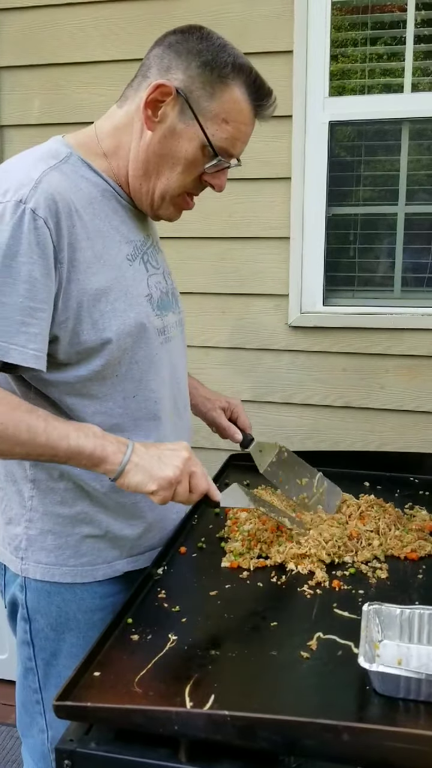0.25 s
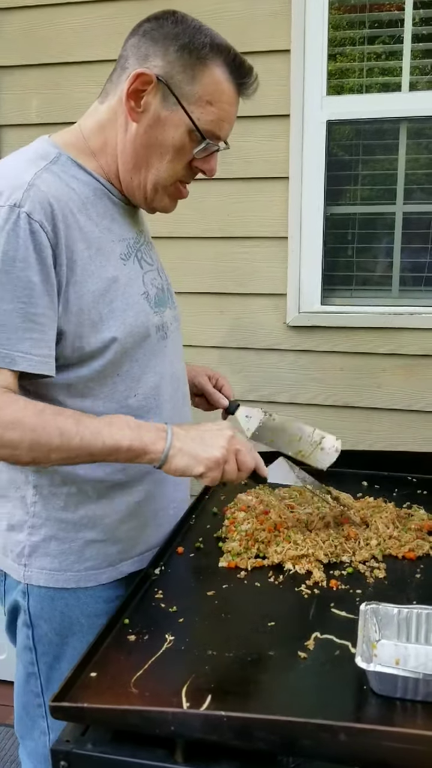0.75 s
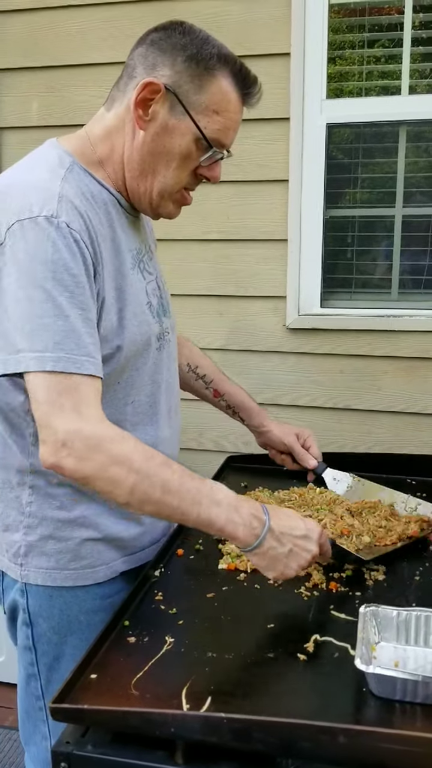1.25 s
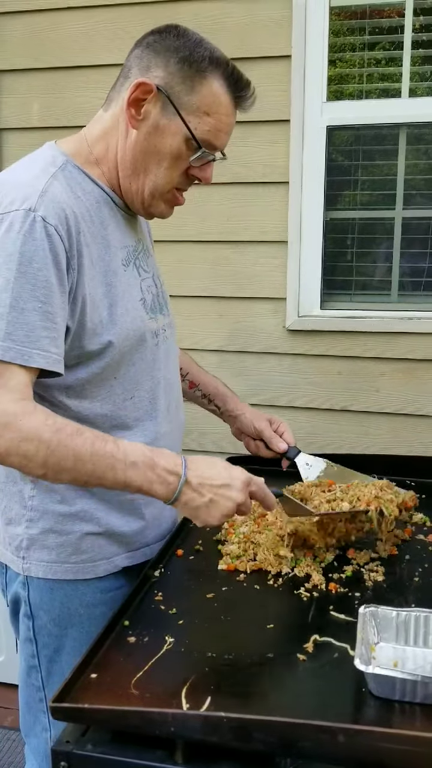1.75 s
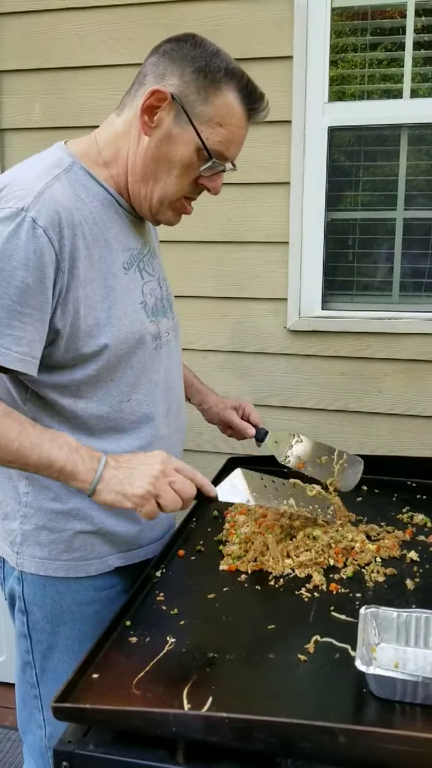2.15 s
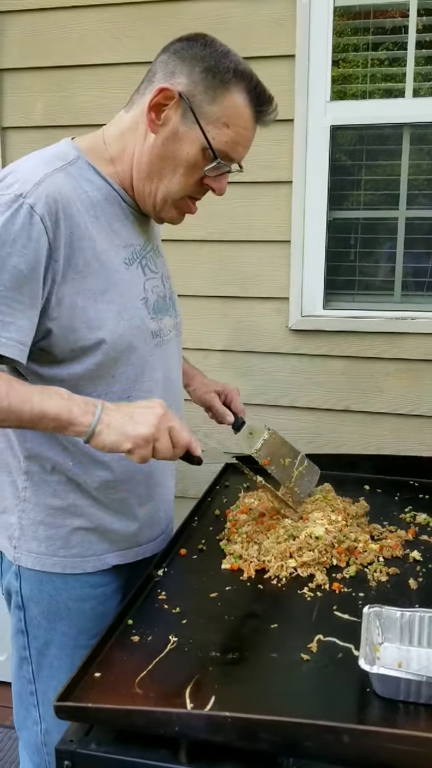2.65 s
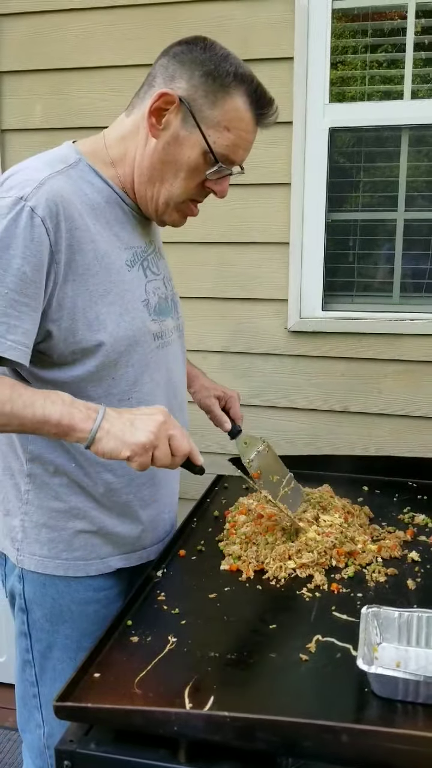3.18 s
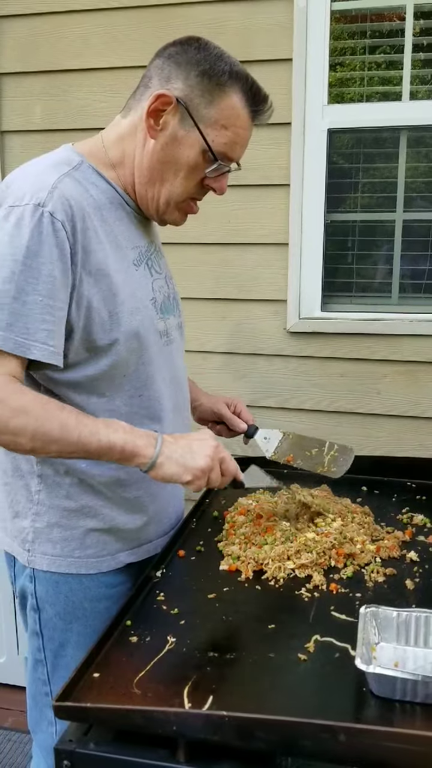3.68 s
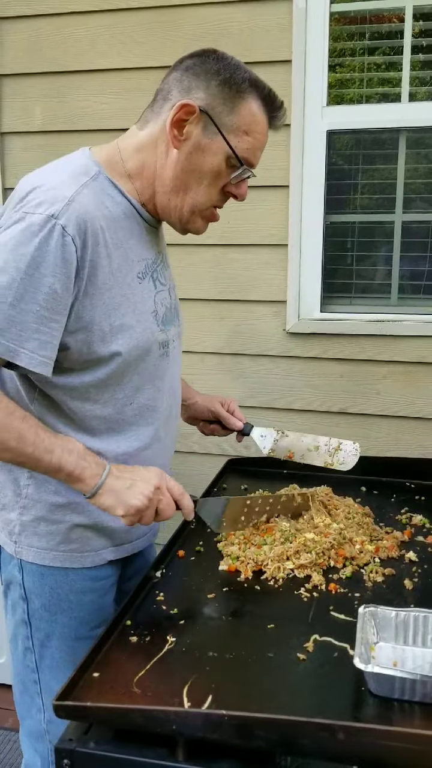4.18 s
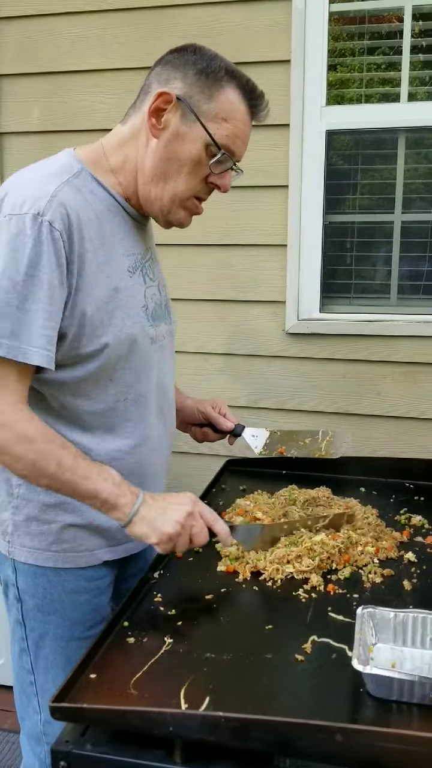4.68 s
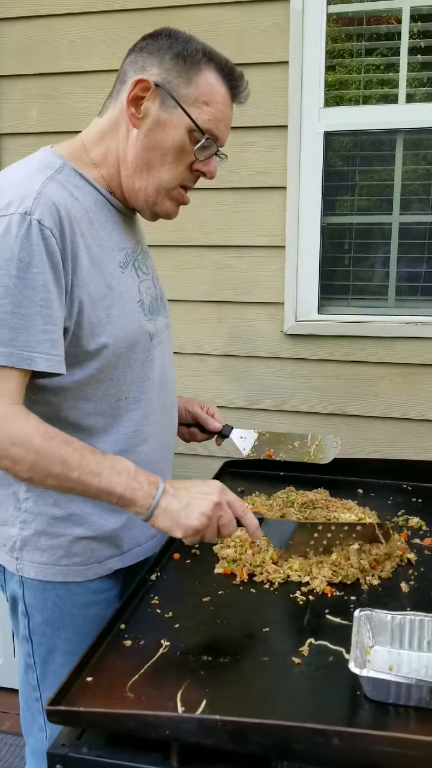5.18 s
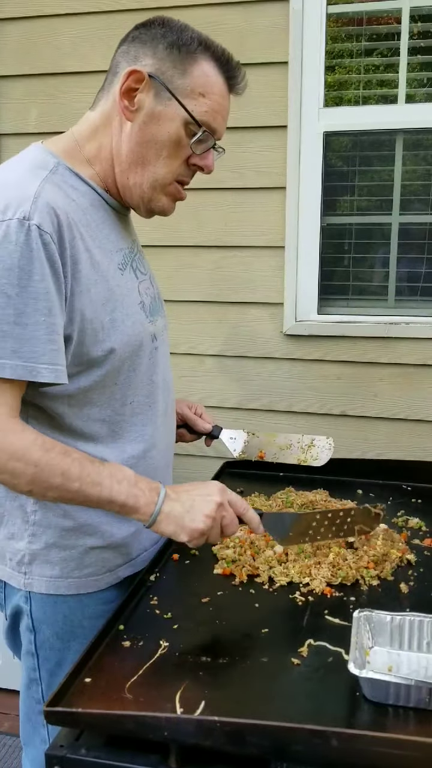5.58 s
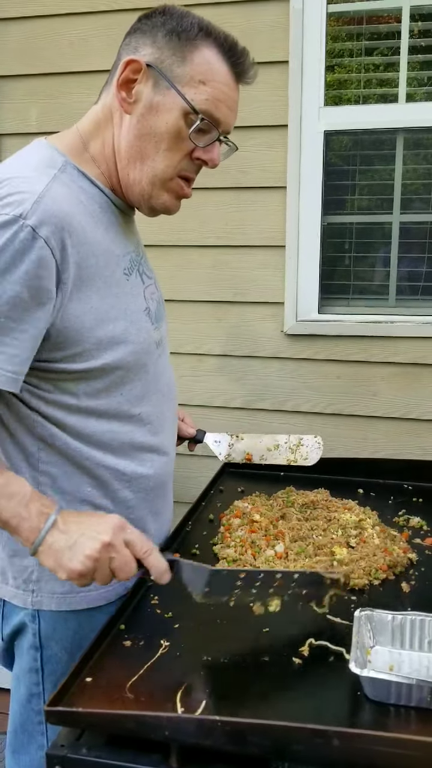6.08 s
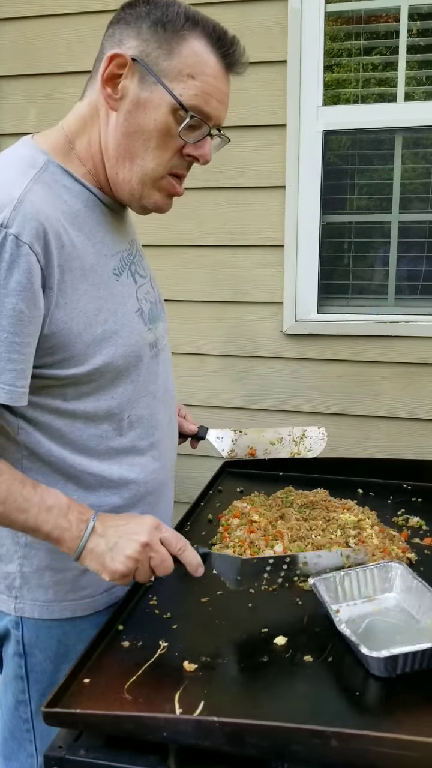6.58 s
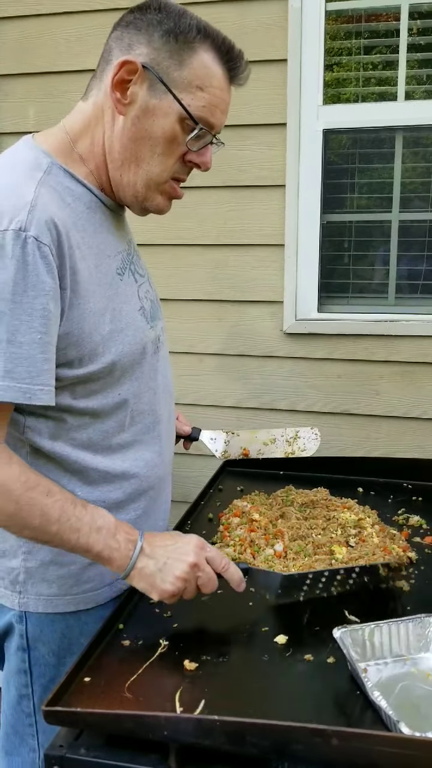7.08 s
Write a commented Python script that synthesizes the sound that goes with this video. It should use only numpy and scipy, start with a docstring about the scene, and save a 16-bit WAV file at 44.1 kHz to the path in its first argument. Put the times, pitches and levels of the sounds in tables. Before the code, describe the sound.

Close stereo outdoors by a house wall, with a faint low rumble and hum. A light sizzle crackles throughout, slightly right, flaring gently when food is turned. A barely audible touch at 0 s and a soft knock at 0.25 s precede a thin blade clink at 0.8 s and a strong, bright clank at 1.04 s, running into a ringing scrape. A sharp oil pop snaps at 1.5 s. Blades clink lightly at 2.3 to 2.5 s and more clearly at 3.0 s; then mostly sizzle and small spits. From 4.3 s come dull, food-cushioned knocks and short scrapes, notably around 4.7, 5.1 and 5.7 s. At 6.3 s a strong, broad scrape swells with livelier sizzle, and a hollow foil tray thumps at 6.4 s. Hard clanks follow at 6.6, 6.8 and 6.9 s with another scrape near 7.0 s; a last bright clank rings at 7.3 s. Reflections are short and dull.

```python
"""Two steel spatulas turn fried rice on an outdoor flat-top griddle, close to a house wall; stereo, blades
right of centre. From the start food sizzles and spits over a low outdoor rumble, and the plate already rings
faintly. A strong clank and a scrape come at about 1 s; until 3 s the blades also clink together. From 4.3 s
come thick blows and scrapes, with a hollow foil tray shoved at 6.4 s and the last clank at 7.3 s. Noise shaped
by steel modes makes the clanks, clinks and scrapes, decaying sines the plate's tones, short bursts the spits,
and filtered noise the sizzle, rumble and wall tail."""
import sys
import numpy as np
from scipy import signal
from scipy.fft import rfft, irfft, next_fast_len
from scipy.io import wavfile
from scipy.ndimage import map_coordinates

SR = 44100
rng = np.random.default_rng(int(sys.argv[2]) if len(sys.argv) > 2 else 0)


def to_wav(s):
    """Save 16-bit WAV."""
    ch = np.atleast_2d(s).T  # columns
    pcm = np.round(np.clip(ch, -1, 1) * 32767)  # PCM
    wavfile.write(sys.argv[1], SR, pcm.astype(np.int16))


N = 323240  # samples

# All level_db columns are relative: later gains are added to them.
# Outdoor rumble spectrum: pitch_hz, level_db
RUMBLE_SPECTRUM = [(12, -47.5), (20, -24), (43, -3), (82, -5), (123, -3), (145, -10), (226, -12),
                   (265, -19.5), (300, -16), (382, -23.5), (458, -20.5), (497, -21), (967, -21),
                   (1920, -34.5), (2500, -39), (3250, -54), (5500, -120)]
RUMBLE_DB = -63.5
# Left-right likeness of the rumble and the wall tail: pitch_hz, likeness (-1 to 1)
AMBIENT_LIKENESS = [(60, 0.91), (130, 0.97), (290, 0.81), (640, 0.71), (1410, 0.56), (3100, 0.77),
                    (6820, -0.59), (15000, 0.091)]
# Sizzle spectrum: pitch_hz, level_db
FRYING_SPECTRUM = [(880, -38.5), (1500, -10), (2000, -8.5), (3450, -1), (5400, 2), (9000, -5.5), (12000, 3),
                   (14000, -6), (16000, -1)]
# Food turned onto bare hot steel: start_s, flare_db
FOOD_TURNS = [(0.26, -56), (1.081, -62), (2.4, -61.5), (4.28, -59), (5.35, -60), (6.28, -45)]
SIMMER_DB = -63  # food left alone, before the sizzle's own gains
FLARE_RISE_S, FLARE_DRY_S = 0.07, 0.72  # fresh moisture boils up quickly, then dries off
# Loudest spits of hot oil: start_s, level_db, zing_db, left_minus_right_db
OIL_SPITS = [(0.189, -37, -8, 4.5), (0.8727, -30, 0, 6), (0.9918, -26, -2, -1.5), (1.0136, -36.5, -6, 0),
             (1.5334, -15, -1.5, -1), (1.7659, -36.5, -4.5, 3), (2.4198, -29.5, -4, 6.5),
             (2.587, -30, 3, -1.5), (3.265, -19.5, 2.5, -1), (3.713, -23, 8.5, 4.5),
             (3.8557, -32.5, 4.5, -4.5), (4.2183, -32, 7.5, 7.5), (4.4615, -27, 1.5, -2.5),
             (4.49, -32.5, 0, 0.5), (4.8454, -21, 3.5, -5)]
# Blade against blade: start_s, level_db, body_db, zing_db, note_hz, left_minus_right_db, rise_s
BLADE_CLINKS = [(0.7871, -31.5, -11.5, -6.5, 2210, 0.5, 0.001), (2.3364, -27, -3, 1.5, 2230, 1, 0.003),
                (2.472, -32.5, 1.5, 1, 1680, 2, 0.017), (2.9942, -20, -7, 3.5, 1445, 2.5, 0.0013)]
# Strokes along the plate: start_s, push_s, hold_s, release_t60_s, pressure_db, brightness_db,
# tilt_db (brightening as the blade tilts)
BLADE_STROKES = [(1.11, 0.063, 0.036, 0.44, -32, 3.5, 4), (4.295, 0.019, 0.058, 0.095, -46.5, -15.5, -5),
                 (4.712, 0.027, .005, 0.25, -46.5, -2.5, 3), (5.036, 0.066, 0.014, 0.3, -37.5, -4.5, -10.5),
                 (5.771, 0.035, .005, 0.145, -47.5, -3, -2), (6.289, .055, 0.084, 0.27, -25, -2, -7),
                 (6.712, .025, .01, 0.28, -41, -10, -1), (6.974, 0.084, 0.037, 0.26, -32.5, -4, 2)]
# Blows on the plate: start_s, level_db, thud_db, edge_db, zing_db, ring_factor (scales decay time),
# low_hz, high_hz (resonances of the contact point)
PLATE_BLOWS = [(0.002, -44, -10.5, -6, -13.5, 1.02, 1070, 1480),
               (0.254, -31.5, -7, 1, -3.5, 1.08, 1084, 1440),
               (1.036, -11, -24.5, -1.5, -2, 1.04, 741, 2770), (3.083, -39, -13, 3, -0.5, 0.9, 1060, 2100),
               (4.283, -30.5, -11.5, -34, -19.5, 0.79, 1070, 1256),
               (4.643, -29, -15, 1, -3, 1.01, 1090, 1810), (4.679, -23, -14, -5.5, -8.5, 0.75, 965, 3290),
               (5.0895, -33, -35, -0.5, -5, 0.412, 1320, 5120),
               (5.103, -25.5, -35, -5, -18.5, 0.78, 1320, 2900),
               (5.42, -40.5, -7, -8.5, -4, 1.24, 727, 1320), (5.488, -37, -19, -6, -6.5, 0.65, 947, 1470),
               (5.718, -22, -16.5, -14.5, -26.5, 0.81, 1210, 1430),
               (6.226, -23, -20, -4, -11, 1.5, 1050, 2180),
               (6.569, -19, -13.5, -7.5, -2.5, 0.64, 810, 1250),
               (6.589, -16.5, -35, -5, -11, 0.18, 1260, 1380),
               (6.808, -13.5, -16.5, -6, -12.5, 0.98, 1030, 1384),
               (6.9248, -12.5, -20.5, -5.5, 3.5, 0.39, 917, 3270),
               (7.2933, -12, -26, 0, -6.5, 1, 966, 2770)]
# Long tones of the plate: pitch_hz, level_db, t60_s
PLATE_TONES = [(275, -12, .8), (360, -7, 1.0), (405, -5, .65), (706, -18, .85), (925, -14, .4),
               (945, -13, .5), (1092, -18, .3), (1339, -9, .22), (1441, -15, .3), (1625, -9, .2),
               (2078, -8, .18), (2177, -9, .2), (2264, -9, .18), (2527, -12, .2), (7533, -4, .14),
               (7812, -9, .12), (9226, -8, .14), (11551, -6, .13), (12369, -5, .13)]
# Dense steel modes between the resonances: pitch_hz, level_db
DENSE_MODES = [(40, -57), (130, -11.5), (230, -8.5), (370, -5), (450, -9.5), (620, -5.5), (1050, 0.5),
               (1700, -2), (3000, -3.5), (5200, -3.5), (7600, -11), (8400, -15.5), (12000, -7),
               (16000, -15.5)]
# Corners between thud, body, edge and zing: pitch_hz
BAND_CORNERS = [400, 650, 2300, 4600, 11000]
# Plate decay before each blow's ring_factor, for thud, body, edge, zing: t60_s
PLATE_DECAY = [1, 0.59, 0.36, 0.18]
# Free blade decay for body, edge, zing: t60_s
BLADE_DECAY = [0.097, 0.084, 0.085]
# Crowded top modes of a free blade: pitch_hz, width_hz, level_db
TOP_BLADE_MODES = (13000, 1400, -9)
# Left-right likeness of the steel: pitch_hz, likeness (0 to 1)
STEEL_LIKENESS = [(100, 1), (350, 0.84), (750, 0.39), (1200, 0.37), (2000, 0.22), (5000, 0.17),
                  (14000, 0.11)]
# Resonances of a blade, set by how it meets the plate: pitch_hz, width_hz, level_db
LANDING_MODES = [(710, 44, -7), (911, 25, -3), (3094, 170, -9.5), (5040, 95, -9.5), (7330, 62, -10),
                 (8000, 53, -14.5), (7700, 63, -16), (8950, 93, -10), (8680, 42, -14.5), (9940, 54, -6),
                 (11700, 88, -21), (11300, 89, -7), (12500, 49, -12), (13450, 74, -12.5),
                 (13080, 56, -15.5), (13240, 46, -20), (14000, 39, -7.5), (15300, 42, -17)]
PUSHING_MODES = [(937, 26, 4.5), (1723, 29, 2), (2125, 24, 4.5), (2576, 36, 4.5), (4980, 46, -6.5),
                 (5700, 50, -13.5), (6130, 33, -24), (6980, 154, -12.5), (9290, 28, -9.5),
                 (9600, 62, -17.5), (11340, 31, -10.5), (11650, 41, 1), (12480, 95, -11.5), (13000, 60, -4),
                 (14200, 34, -10.5), (15300, 41.5, -13)]
DIGGING_MODES = [(940, 24, 12), (1320, 28, 5.5), (1750, 32, -7), (2220, 65, 2), (2670, 24, 8),
                 (2900, 180, -1), (3170, 31, -2), (4370, 26, 3.5)]
SWEEPING_MODES = [(947, 8.6, 0), (2160, 28, -9), (3270, 29, -5), (3870, 76, -10), (4700, 41, -2),
                  (5590, 71, -13.5), (6800, 94, -3.5), (7520, 54, 0), (7900, 47, -11), (8830, 120, -10.5),
                  (9200, 44, -10), (10600, 40, -7), (11180, 100, -10), (11460, 33, -10), (14200, 70, -17),
                  (15200, 77, -12.5)]
FREE_MODES = [(1600, 56, -11.5), (4970, 66, -6), (7120, 70, -9.5), (7980, 45, -4.5), (8300, 23, -9.5),
              (8750, 38, -12.5), (9600, 32, -5.5), (10900, 43, 0), (11900, 74, -12.5), (11800, 78, -9)]
# The blade resonances of each stroke in turn
STROKE_MODES = [PUSHING_MODES, LANDING_MODES, LANDING_MODES, DIGGING_MODES, DIGGING_MODES,
                SWEEPING_MODES, SWEEPING_MODES, SWEEPING_MODES]
BRIGHT_PER_PRESSURE = 0.43  # a blade pressed harder rasps brighter (dB per dB)
# Colour of the two microphone ports: pitch_hz, left_minus_right_db
PORT_COLOUR = [(100, 1.5), (350, 2), (650, 2.5), (1300, 0), (2500, 0.8), (4800, -3), (8000, 1.5),
               (11500, -2.5), (15000, 6.5)]
TOP_HZ = 16000  # band limit of the microphones


def amp(db):
    """Decibels to amplitude."""
    return 10 ** (np.asarray(db) / 20)


def unit(x):
    """x scaled to rms 1."""
    return x / np.sqrt(np.mean(x ** 2) + 1e-20)


def along(points, hz):
    """Interpolate (Hz, value) points on a log frequency axis."""
    f, v = np.transpose(points)
    return np.interp(np.log(hz + 1), np.log(f + 1), v)


def filtered(x, response):
    """x times a response of frequency."""
    n = x.shape[-1]
    padded = next_fast_len(n + SR // 5)
    hz = np.fft.rfftfreq(padded, 1 / SR)
    return irfft(rfft(x, padded) * response(hz), padded)[..., :n]


def coloured(x, points):
    """x filtered to a curve of (Hz, dB) points."""
    return filtered(x, lambda hz: amp(along(points, hz)))


def wobble(rate, n):
    """A smooth random curve, rate knots a second."""
    knots = rng.standard_normal(int(n * rate / SR) + 4)
    return map_coordinates(knots, [np.arange(n) * rate / SR])


def add(out, s, x):
    """Mix x into out from time s on."""
    i = max(round(s * SR), 0)
    out[:, i:i + x.shape[-1]] += x[..., :N - i]


def spread(pair, likeness):
    """Two unrelated signals become left and right of a given likeness."""
    def mid_side(hz):
        angle = np.arccos(np.clip(along(likeness, hz), -1, 1)) / 2
        return np.array([np.cos(angle), np.sin(angle)])
    mid, side = filtered(pair, mid_side)
    return np.array([mid + side, mid - side])


def placed(x, pan_db):
    """x with its left side pan_db above its right."""
    return x * amp(pan_db * np.array([[.5], [-.5]]))


def from_right(x, lag):
    """The left side hears x lag seconds after the right."""
    return filtered(x, lambda hz: np.exp(1j * np.pi * hz * lag * np.array([[-1], [1]])))


def outdoors(hum_db=-69, hum_hz=119):
    """A low steady rumble of filtered noise, with a faint hum wavering in phase and level."""
    rumble = unit(coloured(spread(rng.standard_normal((2, N)), AMBIENT_LIKENESS), RUMBLE_SPECTRUM))
    phase = 2 * np.pi * hum_hz * np.arange(N) / SR + 0.44 * wobble(2, N)
    hum = np.sin(phase) * amp(3.5 * wobble(1.9, N))
    return amp(RUMBLE_DB) * rumble + amp(hum_db) * hum


def wall(x, t60=0.36, dull_hz=5000):
    """The house wall and the deck answer with a short, dull tail of decaying noise."""
    t = np.arange(SR // 2) / SR
    tail = rng.standard_normal((2, len(t))) * amp(-60 * t / t60) * (1 - np.exp(-t / 0.0072))
    tail = spread(tail, AMBIENT_LIKENESS) / np.linalg.norm(tail[0])
    tail = filtered(tail, lambda hz: 1 / (1 + 1j * hz / dull_hz))
    return signal.fftconvolve(x, tail, axes=1)[:, :N]


def boiling():
    """Strength of the sizzle: a steady simmer, and a flare each time the food is turned."""
    power = amp(SIMMER_DB) ** 2
    for s, db in FOOD_TURNS:
        age = np.maximum(np.arange(N) / SR - s, 0)
        flare = amp(db) * (1 - np.exp(-age / FLARE_RISE_S)) * np.exp(-age / FLARE_DRY_S)
        power = power + flare ** 2
    return np.sqrt(power)


def pop(zing_db, tail_db=-27, tail=.0028):
    """A droplet bursts: one snap and its scatter off the plate, peak 1."""
    t = np.arange(SR // 40) / SR
    scatter = rng.standard_normal((2, len(t))) * np.exp(-t / tail)
    burst = (t == 0) + amp(tail_db) * scatter
    colour = [(500, -13.5), (2200, -15.0), (4500, -1.5), (7500, -2.5), (13000, zing_db)]
    burst = coloured(np.pad(burst, ((0, 0), (16, 0))), colour)
    return burst / np.abs(burst).max()


def sizzle(hiss_db=2, fizz_db=-4, crackle_db=16, crackle_rate=36, size_db=6.0):
    """Countless tiny bubbles merge into a hiss, with distinct crackles on top (crackle_rate a second)."""
    bubbles = rng.standard_normal((2, N)) * (rng.random(N) < 700 / SR)
    fizz = rng.standard_normal((2, N)) + amp(fizz_db) * unit(bubbles)
    out = amp(hiss_db) * unit(coloured(fizz, FRYING_SPECTRUM))
    for when, chance in rng.random((int(crackle_rate * N / SR), 2)):
        size = min(-np.log(chance), 2.6)  # mostly small, a few large
        add(out, when * (N - 1) / SR, amp(crackle_db + size_db * size) * pop(0))
    return boiling() * out


def spits(level_db=5):
    """The larger bursts of water in the hot oil, each a single pop."""
    out = np.zeros((2, N))
    for s, db, zing_db, pan_db in OIL_SPITS:
        add(out, s, placed(amp(db + level_db) * pop(zing_db), pan_db))
    return out


def tray(s=6.358, db=-27.5, rise=.006, hollow_hz=235, octaves=.65):
    """The blade shoves the empty foil tray: one hollow thump about an octave wide."""
    t = np.arange(SR // 4) / SR
    hump = lambda hz: np.exp(-(np.log2((hz + 1) / hollow_hz) / octaves) ** 2)
    hollow = unit(filtered(rng.standard_normal(len(t)), hump))
    out = np.zeros((2, N))
    add(out, s, amp(db) * hollow * t / rise * np.exp(1 - t / rise))
    return out


def steel_bands(force, modes, peaks_db, blur_db=1.06, uneven_db=3, spacing_hz=32):
    """A force coloured by the steel, split into thud, body, edge and zing, each of rms 1."""
    luck = rng.standard_normal(SR // 20)

    def steel(hz):
        # each octave up, a resonance stands blur_db less clear of the dense modes
        peaks = sum(amp(db + peaks_db - blur_db * np.log2(f / 1500)) ** 2 / (1 + ((hz - f) / width) ** 2) ** 2
                    for f, width, db in modes)
        # each contact point drives some of the dense modes hard and misses others
        uneven = uneven_db * map_coordinates(luck, [hz / spacing_hz], mode="mirror")
        dense = amp(along(DENSE_MODES, hz) + uneven)
        return np.sqrt(dense ** 2 + peaks)

    sound = filtered(spread(force, STEEL_LIKENESS), steel)
    # share of each band at the five corners
    shares = [[1, 0, 0, 0, 0], [0, 1, 1, 0, 0], [0, 0, 0, 1, 0], [0, 0, 0, 0, 1]]
    return [unit(filtered(sound, lambda hz: np.interp(np.log(hz + 1), np.log(BAND_CORNERS), share)))
            for share in shares]


def plate_tones(t, thud_db, zing_db, point_hz=0, near_db=13, near_hz=35, scatter_db=2):
    """The plate's long tones, struck anew at each contact; one near the contact point's pitch is boosted."""
    ring = 0
    for hz, db, t60 in PLATE_TONES:
        drive_db = along([(400, thud_db), (650, 0), (2600, 0), (7500, zing_db)], hz)
        drive_db += near_db * np.exp(-((hz - point_hz) / near_hz) ** 2) + rng.normal(0, scatter_db)
        # high tones differ between the sides
        phase = rng.uniform(0, 2 * np.pi) + rng.normal(0, min(hz / 2000, 1), (2, 1))
        ring = ring + amp(db + drive_db - 60 * t / t60) * np.sin(2 * np.pi * hz * t + phase)
    return ring


def clinks(level_db=-6, low_hz=1100, note_db=-3, note_width_hz=70, tick_db=0, tick_t60=.012,
           after_db=-32, after_t60=0.216, hold=0.0036):
    """Thin hand-held blades touch or slide together: a bright tick, little bass and a short ring."""
    out, t = np.zeros((2, N)), np.arange(SR // 3) / SR
    for s, db, body_db, zing_db, note_hz, pan_db, rise in BLADE_CLINKS:
        modes = list(FREE_MODES) + [(note_hz, note_width_hz, note_db), TOP_BLADE_MODES]
        body, edge, zing = steel_bands(rng.standard_normal((2, len(t))), modes, peaks_db=11.5)[1:]
        free = np.maximum(t - rise - hold, 0)  # time since the blades parted
        afterring = amp(after_db - 60 * free / after_t60)
        levelled = [body * amp(body_db), edge, zing * amp(zing_db)]
        ring = sum(band * (amp(-60 * free / t60) + afterring) for band, t60 in zip(levelled, BLADE_DECAY))
        tick = (edge + zing) * amp(tick_db + zing_db - 60 * t / tick_t60)
        attack = np.minimum(t / rise, 1) ** 1.28
        add(out, s, placed(amp(level_db + db) * (ring + tick) * attack, pan_db))
    return signal.sosfilt(signal.butter(4, low_hz, "high", fs=SR, output="sos"), out)


def scrapes(level_db=0, thud_db=-17, edge_db=-3, zing_db=-1, judder_db=1.3, judder_rate=120,
            tones_db=-10, touch_db=-17, slip_rate=11000):
    """The edge catches and slips on the crusted plate; the slips drive the blade and keep the plate ringing."""
    out, t = np.zeros((2, N)), np.arange(SR) / SR
    for stroke, modes in zip(BLADE_STROKES, STROKE_MODES):
        s, push, hold, release, pressure_db, bright_db, tilt_db = stroke
        # the blade touches lightly, is pushed to full pressure, held there and eased off
        swell_db = touch_db * np.maximum(1 - t / push, 0)
        swell_db = swell_db - 60 * np.maximum(t - push - hold, 0) / release
        judder = judder_db * wobble(judder_rate, len(t))
        drive = np.minimum(t / 0.0192, 1) * amp(level_db + pressure_db + swell_db + judder)
        tilt = tilt_db * np.clip((t - push) / (push + hold), -1, 1)
        bright = bright_db + BRIGHT_PER_PRESSURE * swell_db + tilt
        slips = rng.standard_normal((2, len(t))) * (rng.random(len(t)) < slip_rate / SR)
        thud, body, edge, zing = steel_bands(slips, modes, peaks_db=11.5)
        rasp = amp(thud_db - 0.072 * bright) * thud + body
        rasp = rasp + amp(edge_db + .5 * bright) * edge + amp(zing_db + bright) * zing
        tones = plate_tones(t, thud_db=-28, zing_db=bright_db - 24.5)
        tones = tones / np.linalg.norm(tones[0])
        ring = signal.fftconvolve((drive * unit(slips[0]))[None], tones, axes=1)[:, :len(t)]
        add(out, s, drive * rasp + amp(tones_db) * ring)
    return out


def blows(level_db=-13, tones_db=-13, clatter_db=-1, clatter_time=0.027, rise=0.0004, point_db=0,
          point_width_hz=50, tick_db=3, tick_t60=0.022):
    """A blade lands and clatters briefly; then the plate's dense modes die, the treble first."""
    out, t = np.zeros((2, N)), np.arange(SR) / SR
    clatter = amp(clatter_db) * np.exp(-(t / clatter_time) ** 2)
    for s, db, thud_db, edge_db, zing_db, ring_factor, low_hz, high_hz in PLATE_BLOWS:
        point = [(low_hz, point_width_hz, point_db - 4.5), (high_hz, point_width_hz, point_db)]
        # a cushioned blow hardly reaches the upper modes
        softness = [(2000, 0.0025), (3200, 0.15 * min(edge_db, 0))]
        force = coloured(rng.standard_normal((2, len(t))), softness)
        bands = steel_bands(force, list(LANDING_MODES) + point, peaks_db=10.0)
        bands_db = [thud_db, 0, edge_db, zing_db]
        clank = sum(band * amp(band_db) * (amp(-60 * t / (t60 * ring_factor)) + clatter)
                    for band, band_db, t60 in zip(bands, bands_db, PLATE_DECAY))
        clank += bands[-1] * amp(zing_db + tick_db - 60 * t / tick_t60)  # the edge strikes first
        tones = amp(tones_db) * plate_tones(t, 0.78 * thud_db, zing_db, low_hz)
        attack = 1 - np.exp(-t / (rise * amp(-.4 * zing_db)))  # food cushions the dull blows
        add(out, s, amp(db) * (amp(level_db) * clank + tones) * attack)
    return out


def scene(wall_db=-16):
    """The blades work a little to the right of the microphone, and the food lies further right still."""
    food = from_right(spits() + sizzle(), lag=0.00015)
    tools = from_right(blows() + clinks() + scrapes() + tray(), lag=0.00012)
    return tools + food + amp(wall_db) * wall(tools + food) + outdoors()


def record(dry, low_cut_hz=36):
    """Each microphone port has its own colour; the deepest bass and all above the band limit are lost."""
    sound = signal.sosfilt(signal.butter(2, low_cut_hz, "high", fs=SR, output="sos"), dry)
    return filtered(sound, lambda hz: placed(hz < TOP_HZ, along(PORT_COLOUR, hz)))


dry = scene()
out = record(dry)
to_wav(out)
```